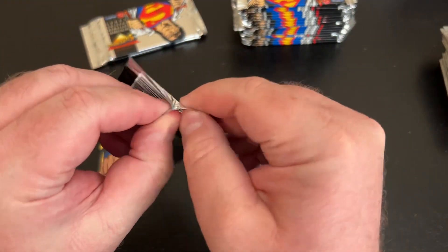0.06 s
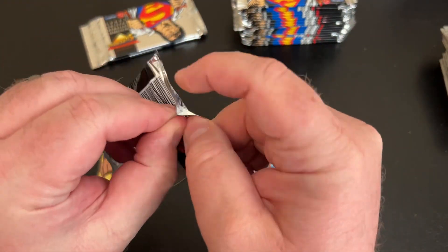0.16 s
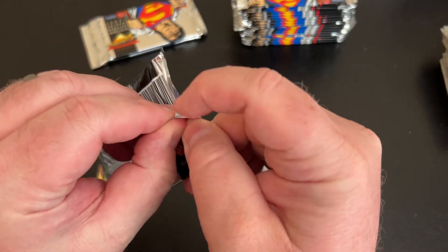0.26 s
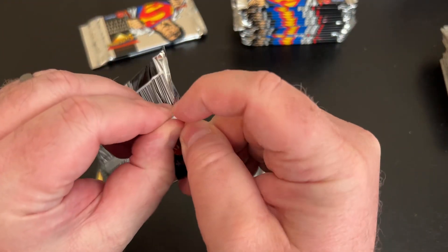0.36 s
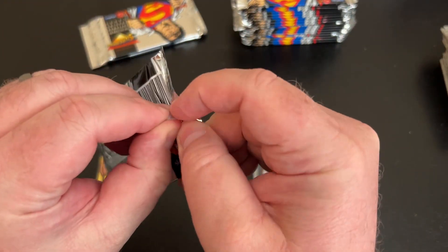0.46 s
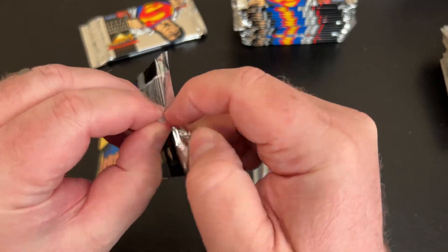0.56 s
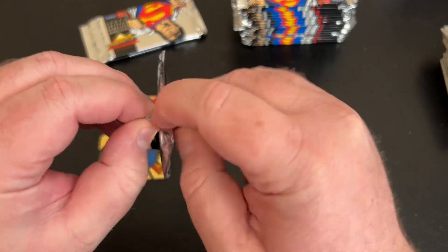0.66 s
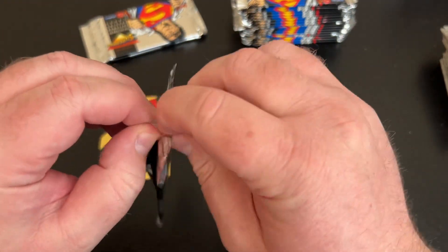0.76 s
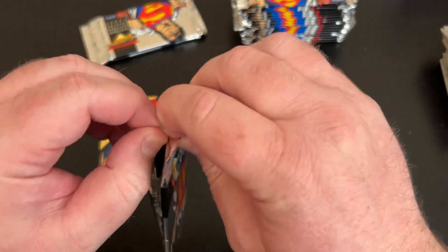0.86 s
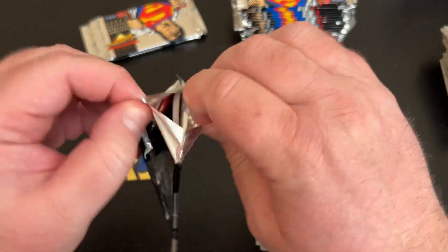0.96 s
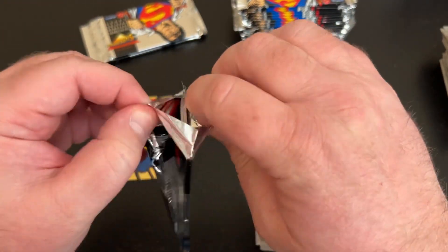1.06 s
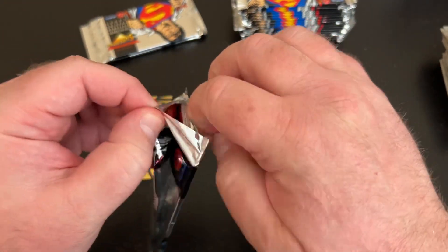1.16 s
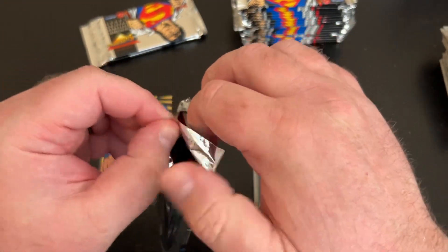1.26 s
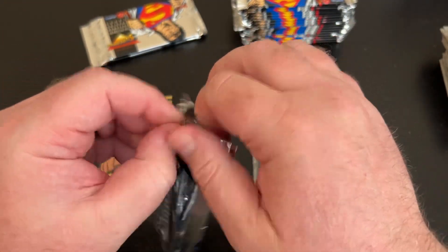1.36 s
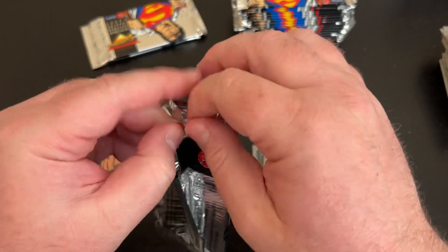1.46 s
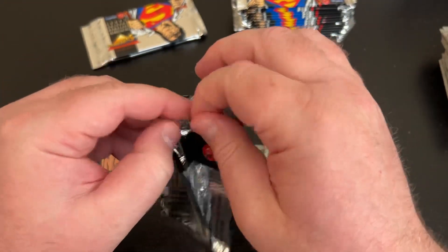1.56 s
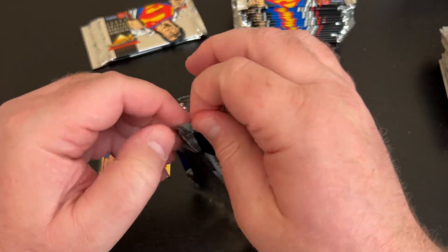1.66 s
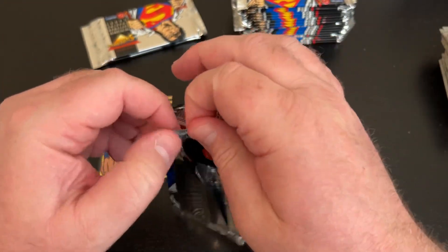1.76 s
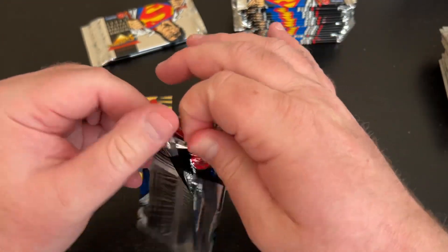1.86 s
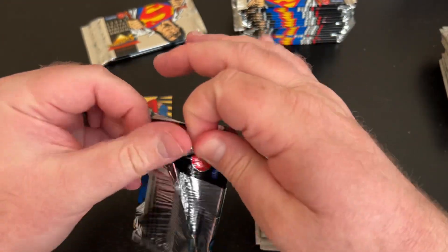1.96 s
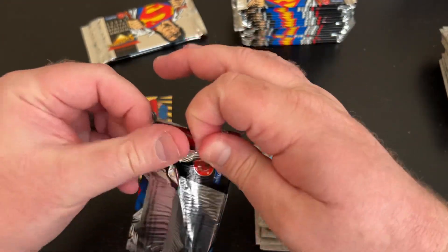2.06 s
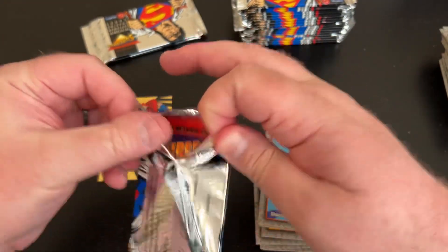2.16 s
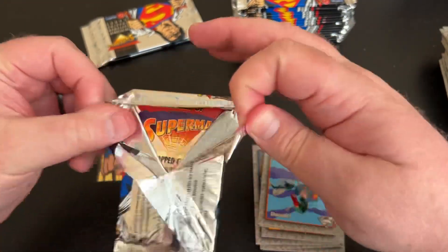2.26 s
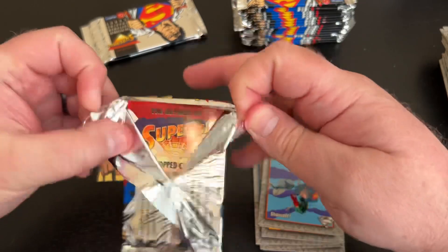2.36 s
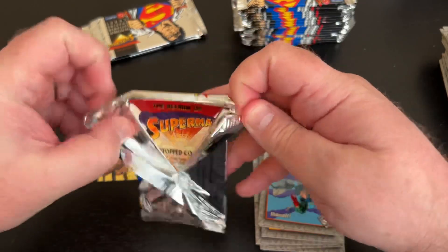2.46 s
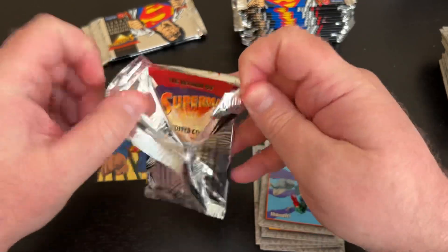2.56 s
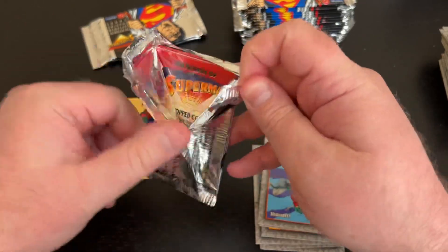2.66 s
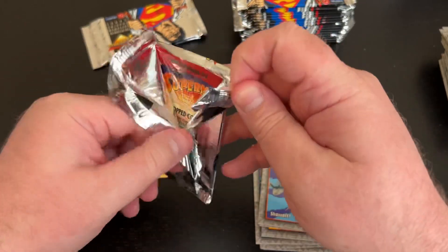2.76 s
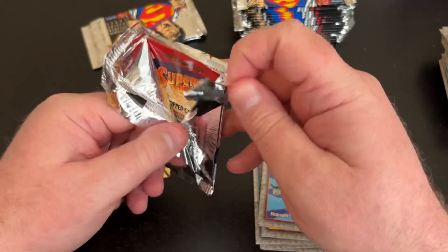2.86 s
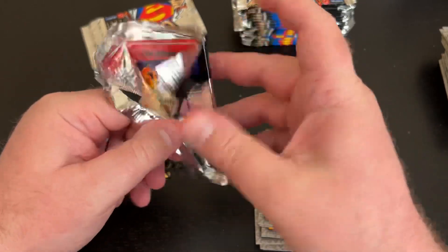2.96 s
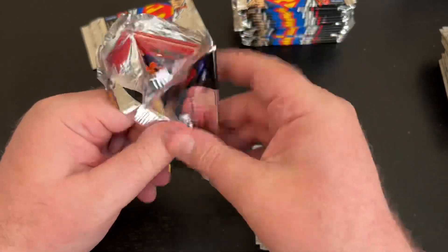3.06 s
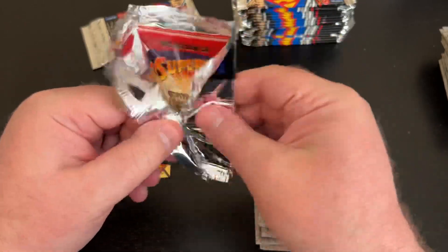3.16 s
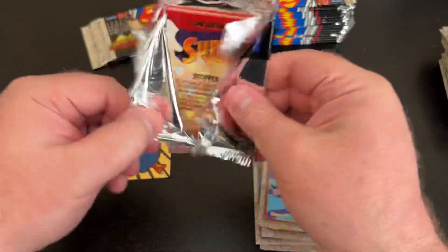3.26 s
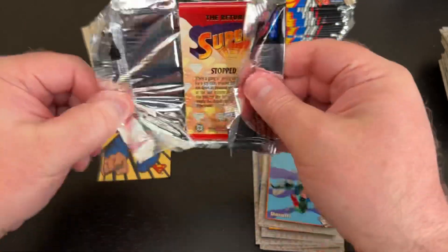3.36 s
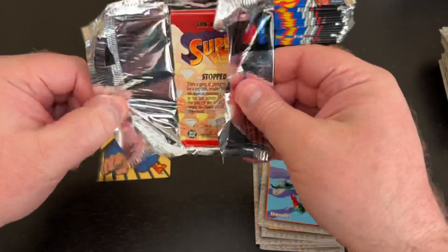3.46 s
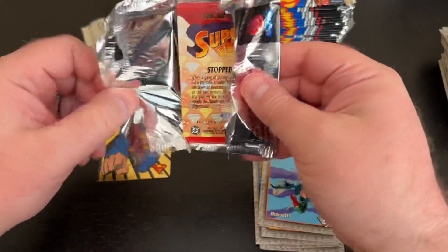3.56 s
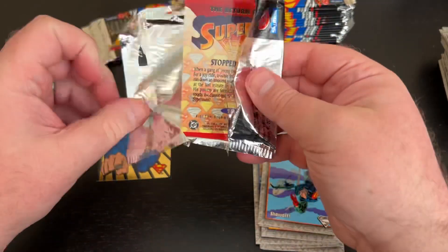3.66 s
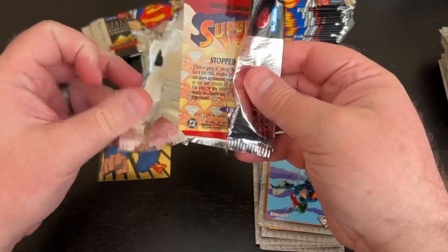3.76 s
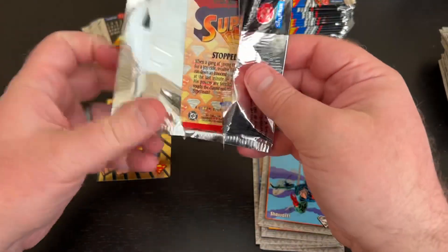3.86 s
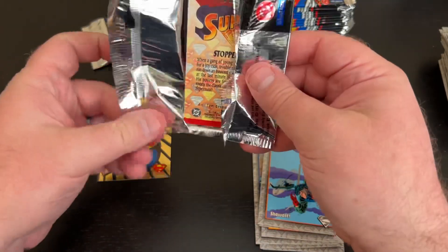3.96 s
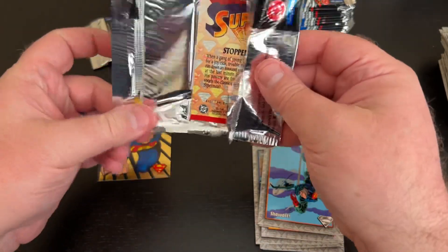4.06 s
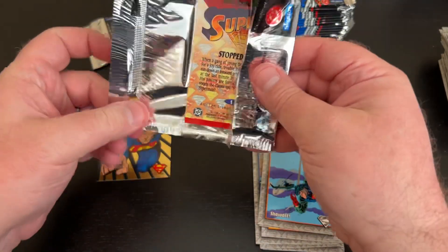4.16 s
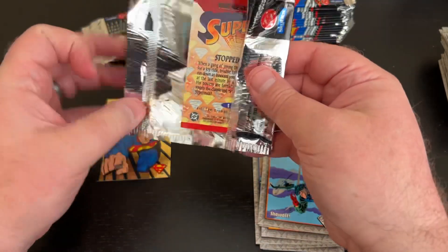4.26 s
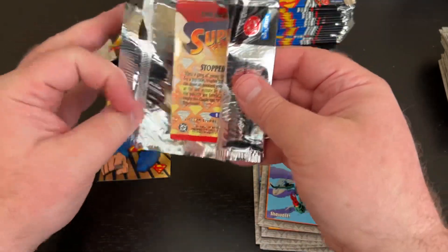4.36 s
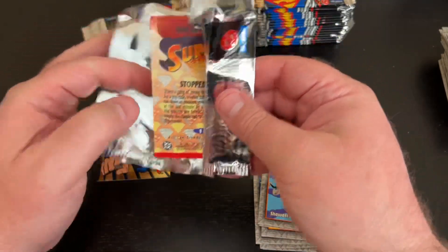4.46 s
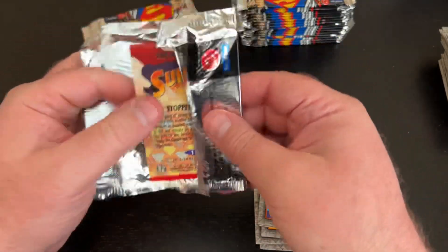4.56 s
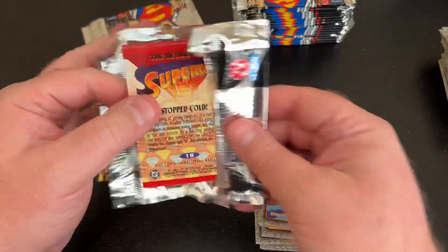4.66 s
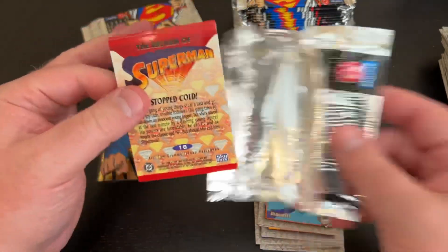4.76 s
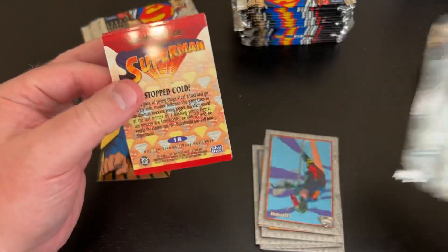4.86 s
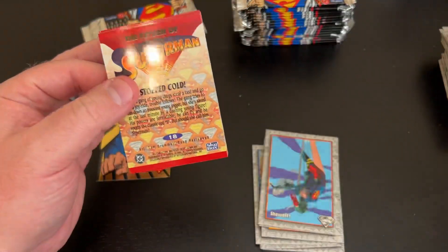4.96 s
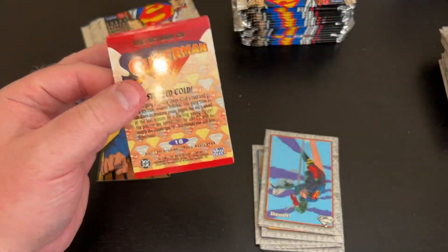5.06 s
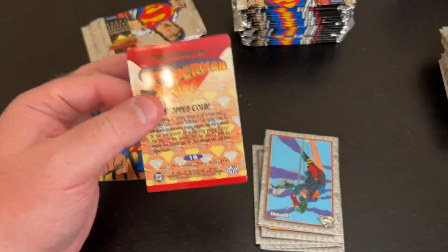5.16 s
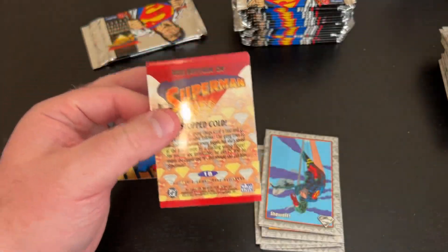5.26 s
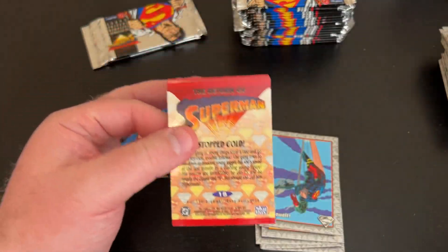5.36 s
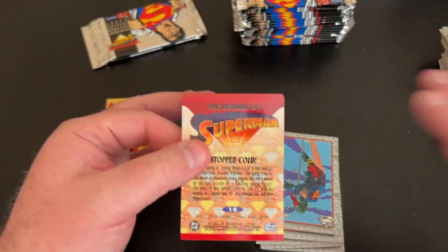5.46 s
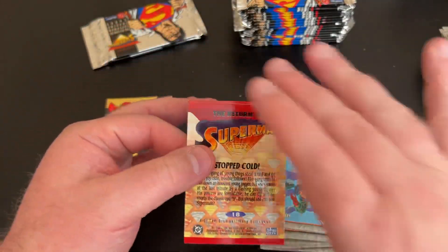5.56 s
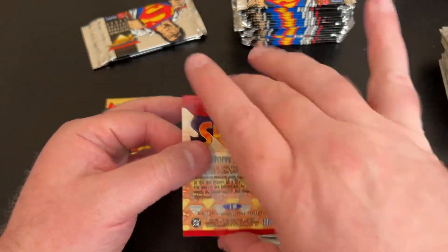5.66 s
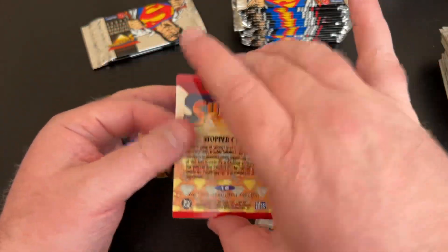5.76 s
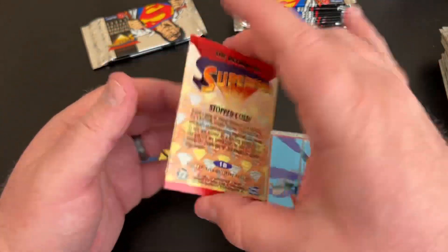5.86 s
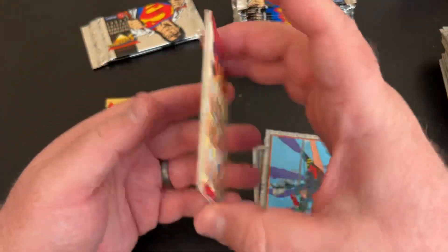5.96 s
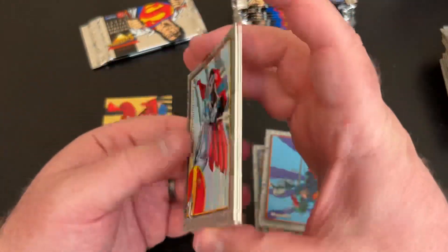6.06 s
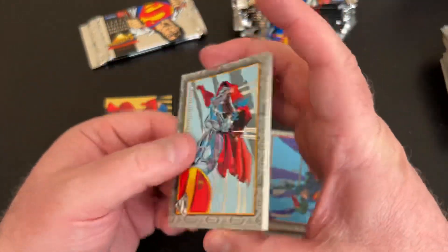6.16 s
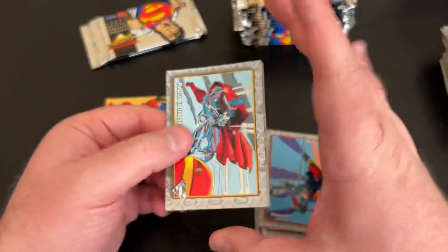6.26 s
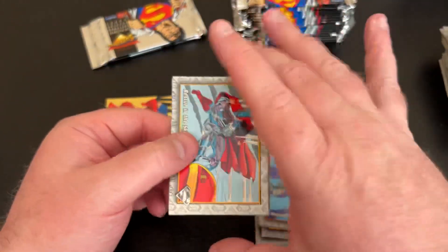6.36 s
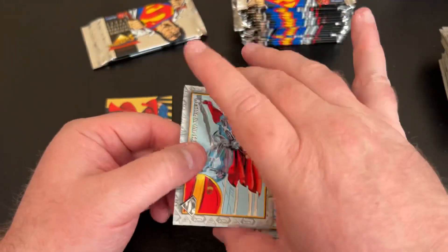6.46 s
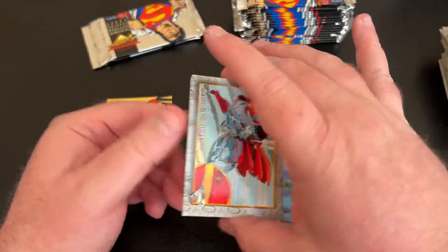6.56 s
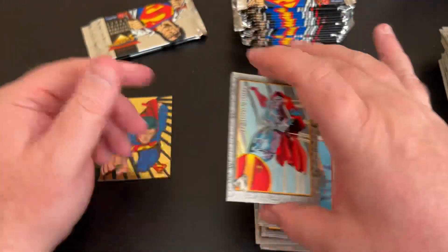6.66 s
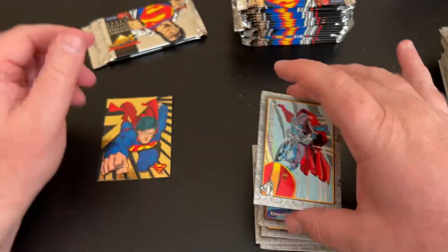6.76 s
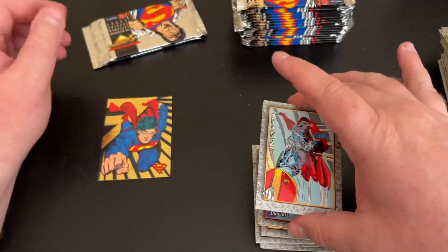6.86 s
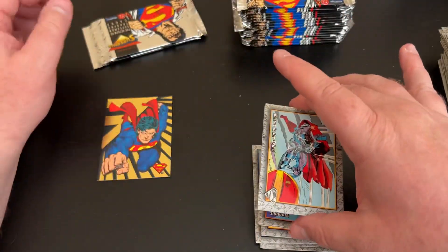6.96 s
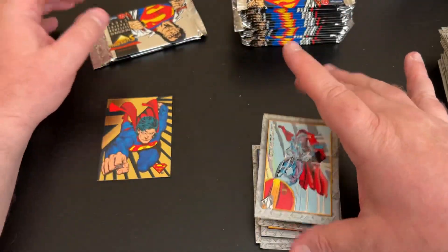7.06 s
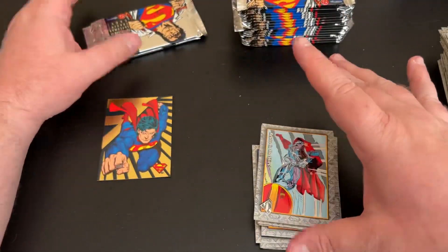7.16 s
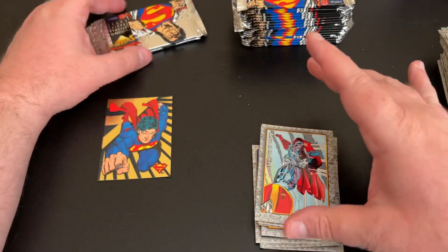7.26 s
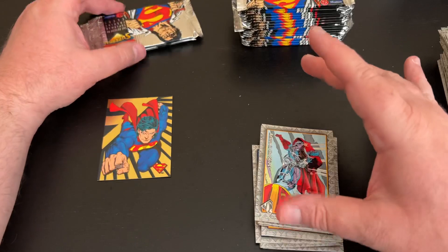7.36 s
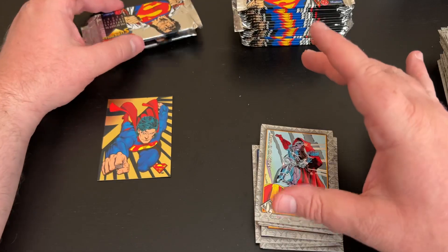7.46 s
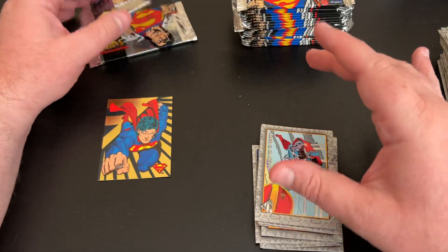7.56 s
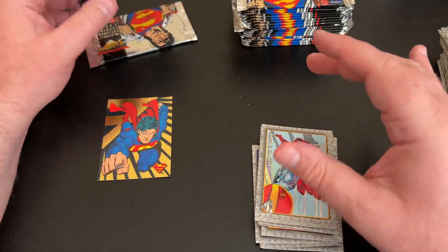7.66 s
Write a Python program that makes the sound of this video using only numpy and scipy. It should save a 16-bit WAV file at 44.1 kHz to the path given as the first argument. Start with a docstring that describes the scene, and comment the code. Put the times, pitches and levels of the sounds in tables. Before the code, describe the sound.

A close, dry stereo pickup in a small, softly furnished room, with low rumble, faint mains hum and a very short echo. From 0 s thin, bright foil snaps and ticks come quickly, a little left, easing by 0.6 s. At about 0.9 s a loud, sharp tearing burst stands out. Lighter crackle continues from 1.2 to 2.0 s, then fuller crumpling at 2.1-2.6 s with a dull table knock. The densest, loudest rustling runs 3.1-3.4 s, with a firm knock near 3.3 s. Deeper, scattered crinkles and small bumps follow to 4.8 s, moving towards centre and fading out by 5.3 s. Then near silence, with very faint card brushes around 5.7-6.5 s. A soft, hollow, hissing slide of skin on the table swells at 6.7-7.3 s, peaking at 6.9 s, with low double taps near 7.1 s and 7.5 s, then quiet.

```python
"""Foil packet torn open at a table

Two hands tear open a foil packet close under a phone with two microphone ports, left of centre at first,
pull out the cards and lay them on a table. Foil snaps and crackle are short noise bursts rung by facet modes;
a forearm slides over the table top as coloured noise, and knocks ring the table as decaying sines.
Table top and walls return a short echo; behind lie low shaking, room air and mains hum, all filtered noise or sines."""
import sys
import numpy as np
from scipy import signal
from scipy.fft import rfft, irfft, next_fast_len
from scipy.io import wavfile
from scipy.ndimage import uniform_filter1d

SR = 44100
rng = np.random.default_rng(int(sys.argv[2]) if len(sys.argv) > 2 else 0)


def transcribe(signal):
    """Save signal, clipped to [-1, 1], as a 16-bit WAV file at the path in sys.argv[1]."""
    frames = np.atleast_2d(signal).T
    limited = np.clip(frames, -1, 1)
    pcm = np.round(limited * 32767).astype(np.int16)
    wavfile.write(sys.argv[1], SR, pcm)


N = 339570
SIDES = np.array([[1], [-1]])  # sign of the difference signal on the left and right port


def undb(db):
    """Amplitude factor of a level in dB."""
    return 10 ** (np.asarray(db) / 20)


def unit(x):
    """Scale to an rms of 1."""
    return x / np.sqrt(np.mean(x ** 2))


def curve(table):
    """Columns of a table, interpolated at every sample."""
    s, *columns = np.transpose(table)
    return [np.interp(np.arange(N) / SR, s, c) for c in columns]


def shape(x, points):
    """Colour by (frequency [Hz], level [dB]) points, joined over log frequency."""
    hz, db = np.transpose(points)
    size = next_fast_len(N + SR // 10)
    f = np.maximum(np.arange(size // 2 + 1) * SR / size, 1)
    gain = undb(np.interp(np.log(f), np.log(hz), db))
    return irfft(rfft(x, size) * gain, size)[..., :N]


def walk(rate):
    """Random levels, a new one every 1 / rate s, joined by ramps; spread about 0.65."""
    hold = int(SR / rate)
    steps = np.repeat(rng.standard_normal(N // hold + 1), hold)
    return 0.8 * uniform_filter1d(steps, hold)[:N]


# the packet opens and sounds deeper: (time [s], depth = 0.4-1.2 kHz above 1.2-2.7 kHz [dB],
# left minus right [dB])
PACKET_OPENING = [(0, -8, 4.5), (.55, -6.5, 5), (.8, -8, 3), (1.2, -5.5, 4), (2, -10, 3.5),
                  (2.2, -5.5, 2.5), (2.5, -5, 3.5), (3, -6, 3), (3.4, -2.5, 3.5), (4, 1.5, 1.5),
                  (4.3, 2, 2), (5.4, 0, 0)]
# foil buckling loudly, before the packet colours it: (time [s], level at 4.5-9 kHz [dB], level above that
# at 0.4-1.2, 1.2-2.7, 2.7-4.5 and 11-16 kHz [dB] each, rise [s], t60 [s])
FOIL_SNAPS = [(0.0258, -39, -18, -16, -30, 1.5, 0.0003, 0.026), (0.0543, -39, -13, -4, 1, 2, 0.0026, 0.012),
              (0.0825, -32, -38, -25, -21, 7, 0.0003, 0.0066),
              (0.0933, -30, -31.5, -12.5, -24, 3, 0.00029, 0.023),
              (0.1043, -42.5, -24, -3, -14, 10, 0.00035, 0.005),
              (0.1126, -45, -31, -18, -15.5, 4.5, 0.001, 0.0057),
              (0.1507, -33, -31, -24, -25, 7.5, 0.00015, 0.006),
              (0.1632, -33, -37, -32.5, -31, 5, 0.00051, 0.004),
              (0.18, -35.5, -47.0, -29.0, -21.5, -14, 0.00041, 0.007),
              (0.1891, -28, -29.5, -23, -26, 4.5, 0.0003, 0.0045),
              (0.21, -35.5, -40, -16, -30, 6, 0.0003, 0.0086),
              (0.255, -37.5, -25, -21, -22, -3, 0.00088, 0.019),
              (0.276, -35, -28, -17.5, -30, 2.5, 0.00026, 0.019),
              (0.3235, -46, -17, -17, -21, -5, 0.0004, 0.013),
              (0.381, -57, -25.0, -23, -9, 7, 0.00028, 0.004),
              (0.388, -39, -50.0, -31, -19, 8, 0.00019, 0.004),
              (0.4017, -39.5, -27, -9.5, -22, 4, 0.00041, 0.003),
              (0.4508, -45, -31, -15, -20, 6.5, 0.00027, 0.00394),
              (0.493, -44.5, -17.0, -3, -16, 4.5, 0.0003, 0.008),
              (0.4976, -50, -26.0, -15, -12, 6.5, 0.0012, 0.004),
              (0.5071, -38.0, -39.0, -26, -2.5, -3, 0.00035, 0.028),
              (0.5137, -40, -22, -8, -3.5, -3, 0.0051, 0.029),
              (0.5833, -53, -26.0, -12, -13, 6, 0.0003, 0.009),
              (0.596, -55, -27.0, -5, -14, 5, 0.0003, 0.005), (0.604, -52, -8, -12, -3, 3, 0.0004, 0.014),
              (0.6138, -47.5, -10, -8, -4, -10, 0.0005, 0.018),
              (0.6227, -49.5, -12.0, -6, 0, 6, 0.0003, 0.017),
              (0.636, -41.5, -15, -7, -7, -3, 0.00024, 0.0057),
              (0.656, -48, -4.5, -3, -0.5, 5, 0.0003, 0.016),
              (0.6879, -28, -22, -15, -30, 0, 0.0003, 0.004),
              (0.802, -38.5, -22, -21, -17.5, -12.0, 0.0016, 0.005),
              (0.8766, -48.5, -7.5, -0.5, -8, 3.5, 0.0009, 0.022),
              (0.903, -43.5, -22.5, -13.5, -9, 8.5, 0.00076, 0.005),
              (0.914, -19, -19, -14, -9.5, -2.5, 0.00099, 0.065),
              (0.925, -22.5, -16, -5, -5.5, -7.5, 0.0022, 0.022),
              (0.932, -30, -10, 5, 4.5, -5.5, 0.0078, 0.05),
              (0.943, -23.5, -26, -6.5, -5.5, -8.5, 0.0047, 0.016),
              (0.971, -26.5, -8.5, -12.5, -6, -6, 0.0018, 0.0221),
              (0.9782, -25, -16, -9, -6, -15.0, 0.0044, 0.031),
              (1.0103, -37.5, -19, -18.5, -6, -1, 0.0018, 0.021),
              (1.1866, -51, -4, -11.5, -6.5, 6.5, 0.0003, 0.009),
              (1.211, -34.5, -14.5, -12.5, -10, 5, 0.00035, 0.0065),
              (1.2177, -23, -18.5, -11, -16.5, 1.5, 0.00026, 0.006),
              (1.3436, -38.5, -14, -14, -8.5, -1, 0.0008, 0.01),
              (1.3545, -41.5, -12.5, -6.0, 2, -6, 0.0005, 0.016),
              (1.3637, -35, -4.5, -3.0, -22, -5.5, 0.0021, 0.041),
              (1.3742, -29.5, -23, -9, -26, -6, 0.0013, 0.009),
              (1.3863, -32, -20, -27, -10, -1.5, 0.00046, 0.011),
              (1.465, -44, -2.5, -5, -6.5, -3, 0.0004, 0.04),
              (1.5274, -31.5, -21, -18, -3.5, -3.5, 0.00064, 0.021),
              (1.5394, -39.5, -4, 9, -5, -5, 0.001, 0.017),
              (1.5671, -39.5, -7, -11, -12, -4, 0.0041, 0.017),
              (1.5934, -36, -15.0, 0.5, -2.5, -1, 0.00081, 0.032),
              (1.611, -39, -10, -13, -17, -4, 0.00091, 0.026), (1.64, -42, -7, -1, -4, 1, 0.00071, 0.015),
              (1.6462, -33, -8, 0.5, -2, -5.5, 0.0024, 0.053),
              (1.6785, -35, -22, -15, -6, 3, 0.0005, 0.017), (1.713, -38, -6.5, -8, -9, -4, 0.0043, 0.014),
              (1.7358, -39, -23.0, -32.0, -7, -4, 0.00023, 0.0092),
              (1.8111, -30, -34, -8.5, -1, 1, 0.00027, 0.0065),
              (1.8294, -40.5, -30, -26, 2, -6.0, 0.0011, 0.015),
              (1.842, -38.5, -29, -12, -3.0, 1.5, 0.0004, 0.049),
              (1.855, -42.5, -21, -17, -3, 9, 0.0025, 0.016),
              (1.884, -42.5, -8, -17, -6, 0.5, 0.00083, 0.007),
              (1.8944, -41, -9, 1.5, -5.0, 4, 0.00033, 0.022),
              (1.904, -47, -13.0, -17, 4, 5, 0.0003, 0.005), (1.9246, -42, -1.5, -10, -1, 2, 0.0003, 0.02),
              (1.9597, -58, 13, 24.5, 14, 4, 0.00061, 0.027),
              (1.979, -44.5, -18, -17, 0, 3, 0.00069, 0.014),
              (2.0098, -49.5, -16, -3, 6.5, 0, 0.0008, 0.016),
              (2.1045, -45.5, -7, 6, 6.5, 3.5, 0.0005, 0.025),
              (2.127, -44.5, 4, 7.5, 6, 7.5, 0.00063, 0.03), (2.143, -38.5, -4.5, 9, -3, 0, 0.00072, 0.042),
              (2.162, -34.5, -2, -5, 2, -0.5, 0.0043, 0.021),
              (2.17, -26.5, -1.5, -5, -11, -4.5, 0.0026, 0.044),
              (2.183, -33, -7, -19, -5, 2.5, 0.00063, 0.021), (2.195, -34, -4, -14, 0, -4, 0.0047, 0.05),
              (2.2434, -31.0, -7, -1, 2, 11, 0.00036, 0.013),
              (2.2643, -30, -27, -1, 5.5, -4.5, 0.0039, 0.012),
              (2.289, -37.5, -18, -24, -1, 1.5, 0.0005, 0.013),
              (2.312, -25.5, -17.5, -28, -2, -5.5, 0.0048, 0.05),
              (2.34, -36.5, -19, -12, 7.5, -1, 0.00052, 0.011),
              (2.35, -34.5, -22, 1.5, -12, 3, 0.00055, 0.009),
              (2.3588, -50, 2, -16, -11, -9, 0.00083, 0.025), (2.386, -31, -12, -5, -11, 5, 0.0003, 0.0057),
              (2.4096, -35, -2, 6, 0.5, -10, 0.00038, 0.0051),
              (2.4825, -27, 2.5, 6.5, -1, -1, 0.0019, 0.012), (2.495, -37, -24, 7, -10, -8, 0.00074, 0.039),
              (2.5075, -37.5, 3, -4, -3, 3.5, 0.001, 0.009),
              (2.5186, -30, -4.5, -0.5, -8, 4, 0.00071, 0.017),
              (2.568, -48, -18, -5.0, 2, 3, 0.0007, 0.028), (2.5798, -50, -10, 2, -9, 3, 0.00056, 0.012),
              (2.5904, -33.5, -4, -1, -1, 4, 0.00037, 0.032), (2.6875, -60, 8, 5, -1, -6, 0.0008, 0.012),
              (2.716, -46.5, 3.5, 1, -7, -4.0, 0.00074, 0.016),
              (2.7259, -40.5, -6, -3, -1.5, 2, 0.00076, 0.045),
              (2.749, -51, -12, -3, -3, -7, 0.00051, 0.015), (2.7708, -37, -14, -4.5, -7, 1, 0.0003, 0.008),
              (2.7774, -35, -16.5, -17, -15, 0, 0.00017, 0.005607),
              (2.802, -46.5, -23, -11, -8, 9, 0.0003, 0.019),
              (2.8127, -37, -19, -13, -13, -5, 0.00035, 0.011),
              (2.83, -42, -28, -19, -7, 1, 0.00035, 0.019),
              (2.8821, -39.5, -13, -7.0, -4, 6.5, 0.00059, 0.0089),
              (2.897, -36, -14, -18, -9, 1, 0.00067, 0.012),
              (2.9064, -37.5, -1.5, 5.5, -1, -30, 0.00059, 0.029),
              (2.9405, -31.5, -19, -8.5, -10, -3.5, 0.00073, 0.011),
              (2.9745, -53, 9.5, 10.5, -2, -4, 0.001, 0.014),
              (3.0738, -26.5, -19.5, -10.5, -7.5, 0.5, 0.0003, 0.02),
              (3.096, -37.5, -5.5, -8.5, -10, -8.5, 0.0056, 0.03),
              (3.1174, -28.5, -17.5, -17, -10.5, 5, 0.0003, 0.012),
              (3.1231, -30.5, -18, -8.5, -3, 5, 0.0018, 0.004),
              (3.1451, -35, -8, -13.5, -8.5, 3.5, 0.0003, 0.005),
              (3.1535, -31.5, -19, -10.5, -3.5, 3, 0.0006, 0.015),
              (3.1616, -39.5, -17, -5.0, -2.5, -0.5, 0.0005, 0.021),
              (3.1692, -28, -11, -11, -7.5, 2.5, 0.0006, 0.029),
              (3.1827, -29, -17.5, -7, -4.5, 0, 0.00035, 0.011),
              (3.1891, -28, -7, -7, -3, 5.5, 0.0005, 0.046),
              (3.1997, -23, -22.0, -3.5, -3, 3, 0.0027, 0.02),
              (3.223, -22, -11.5, -4.5, 1.5, -0.5, 0.0004, 0.021),
              (3.2413, -25, -1.5, 2.5, 4, 2.5, 0.0051, 0.044),
              (3.2615, -23.5, -16.5, -4, -3.5, 3.5, 0.0019, 0.015),
              (3.2666, -24, -7, -2, -4.5, -1.5, 0.0051, 0.023), (3.2967, -26, 5, 7, 0, 5.5, 0.0057, 0.04),
              (3.3258, -24.5, 1, -1, 0, 5, 0.0031, 0.036), (3.3322, -16.5, -0.5, 1, -4, -6, 0.0057, 0.028),
              (3.357, -22, 0, 4, -2.5, 2, 0.0032, 0.018), (3.4331, -44.5, 9, 12.5, 5, -9, 0.00079, 0.024),
              (3.455, -43, -20.5, -10.5, -4.5, 0, 0.001, 0.013),
              (3.476, -47, -1.5, 2, -1.5, 4.5, 0.0005, 0.005),
              (3.489, -36.5, 0, -17, -12.5, -4.5, 0.001, 0.012),
              (3.5014, -30.5, 0, -1, -6.5, 1, 0.00079, 0.016),
              (3.5153, -42.5, -2, 7.5, 1.5, -6, 0.0006, 0.018),
              (3.5315, -49.5, -4, -7.5, -15, 15.5, 0.00033, 0.0049),
              (3.5683, -27.5, -3.5, -2.5, 0.5, 8, 0.0002, 0.005),
              (3.5745, -34, -2, -2, -9, -1, 0.0064, 0.015),
              (3.5963, -37, 5, -1.5, -3.5, 12.5, 0.00077, 0.017),
              (3.63, -39.5, -1.5, -12, -15, -10, 0.0019, 0.015), (3.651, -50, 6, 3, -2, -1, 0.001, 0.012),
              (3.671, -51, 8.5, 3, -6, -5, 0.0016, 0.01), (3.682, -52, 14.5, 4, 4, -4, 0.001, 0.012),
              (3.6957, -48, 11, -3, -1.0, -6.0, 0.0004, 0.017),
              (3.7291, -38.5, -5, -1.5, -21, 1, 0.0005, 0.019),
              (3.761, -41.5, -2.5, -3, -12, 0, 0.003, 0.014), (3.811, -55, 8.5, -8, -10, -4, 0.0006, 0.014),
              (3.8933, -53.5, 2.5, 6, -16, -1, 0.00065, 0.012), (3.9022, -53.5, 2, 7, 0, 7, 0.0004, 0.027),
              (3.9727, -40, 2, -1, -11, 2.5, 0.0013, 0.024), (4, -46.0, -12, -4.0, -5, 3, 0.00033, 0.017),
              (4.038, -27, -13.5, -17, -11, 5.5, 0.00024, 0.0039),
              (4.0575, -33.5, 10.5, 3, -3, -18, 0.0026, 0.021),
              (4.0685, -32.0, 2.5, 5, -7, -8, 0.0012, 0.016),
              (4.115, -34.5, 7, 11.5, -7, 5, 0.00059, 0.017), (4.125, -34, -24, -25, -6, 1, 0.0005, 0.011),
              (4.137, -38.5, -7, -13, -7, -21, 0.0018, 0.018),
              (4.166, -39, -9, -4, -5.5, -4, 0.0003, 0.018),
              (4.1901, -43, -11.0, -1, -5, 4, 0.00044, 0.0071), (4.2, -42, 1, 3, -9, 6, 0.00031, 0.015),
              (4.2084, -35, -0.5, -3, -6, 5, 0.002, 0.017), (4.2346, -26, -15, -1.5, -4, 1, 0.00082, 0.016),
              (4.285, -48, 4, -2, 5, -2, 0.00037, 0.017), (4.3232, -54, -18, -1, -9, 3, 0.0004, 0.0099),
              (4.419, -43, -2.5, -4, -5, -16, 0.0027, 0.028), (4.5317, -65, 9, 2, -1, -12, 0.0004, 0.008),
              (4.5502, -49.5, 7.5, 6, 2, -10, 0.00041, 0.012),
              (4.578, -36, -14, -5.5, 0, 1, 0.00051, 0.015),
              (4.6478, -44.5, 0.0, -1, -15, 12.5, 0.0003, 0.0035),
              (4.669, -39.5, -10, -9, -12, -1, 0.0004, 0.006),
              (4.7185, -41.5, 3.5, 3, -10, -2, 0.002, 0.048),
              (4.7257, -33.5, -23, -9.5, -12, 7, 0.00021, 0.004),
              (4.827, -42, -14, 1.5, 1, -8, 0.00026, 0.022),
              (4.9049, -49, -7, -1.5, 0.5, -2, 0.00071, 0.014),
              (4.9356, -54.5, 0, -0.5, -10, -15, 0.0006, 0.013),
              (5.012, -53.5, -4, -1.5, -2.5, -4, 0.00044, 0.082),
              (5.0665, -56.5, -18, -4, 5, -18, 0.00071, 0.013),
              (5.076, -43, -17, -21, -5.5, -11, 0.00016, 0.0092),
              (5.142, -54.5, -6, -19, -3, -15, 0.0008, 0.03),
              (5.192, -49, -10, -12, -6, -13, 0.0005, 0.018),
              (5.232, -58.5, -14, -7, -1, -17, 0.0006, 0.013)]
SNAP_PAN_SCATTER_DB = 3


def snaps():
    """Single loud buckles of the foil, scattered about where the packet lies at that moment."""
    at = (np.transpose(FOIL_SNAPS)[0] * SR).astype(int)
    pan = curve(PACKET_OPENING)[1][at]
    pan = pan + SNAP_PAN_SCATTER_DB * rng.standard_normal(len(FOIL_SNAPS))
    return bursts(FOIL_SNAPS, pan, lag_spread=4.4)


CLUMP_DB = 3  # per unit of walk: buckles set each other off, so the crackle comes in clumps
CRACKLE_AIR_DB = -6.5  # mean level of the top band above 4.5-9 kHz


def crackle(count=5000):
    """Many small buckles of uneven size, colour and place follow the pulls on the foil."""
    chance = rng.random((count, 8))
    s = (np.arange(count) + 3 * chance[:, 0]) * PACKET_OPENING[-1][0] / (count + 3)
    at = (s * SR).astype(int)
    db, fullness = handling(s)
    db = db + CLUMP_DB * walk(45)[at]
    depth, pan = (c[at] for c in curve(PACKET_OPENING))
    size_db = np.minimum(-4 * np.log(1 - chance[:, 1]), 12) - 13  # relative to the pulls' level
    band_db = bands_db(fullness, depth, CRACKLE_AIR_DB) + 8 * (chance[:, 2:7] - .5)
    pan = pan + 6 * (chance[:, 7] - .5)
    t60 = .005 + .008 * chance[:, 2]
    rise = 0.00023 + 0.0018 * chance[:, 3] ** 2
    return buckle(s, db + size_db, band_db, pan, t60, rise, lag_spread=8., size=512)


# pulls on the foil, each a rush of crackle: (start [s], peak [s], end [s], peak level at 4.5-9 kHz [dB],
# fullness = level above that at 1.2-2.7 kHz [dB]); crackle then sets the size of each buckle
FOIL_PULLS = [(-.08, 0.101, 0.17, -41, -10), (.147, 0.146, 0.2, -34, -29), (.05, 0.156, 0.81, -47, -17),
              (0.374, 0.39, 0.48, -42, -14.5), (0.376, 0.504, 0.87, -52, -5), (0.637, 0.686, 0.82, -46, 0),
              (0.717, 0.8, 0.96, -48, -1), (0.903, 0.933, 1.03, -18.5, -6), (.95, 1.047, 1.28, -50.5, -8),
              (1.153, 1.168, 1.21, -48, -1), (1.196, 1.216, 1.33, -36, -8.5),
              (1.329, 1.367, 1.514, -37, -5.5), (1.508, 1.533, 2.15, -44.5, -1.5),
              (1.787, 1.817, 2.04, -40.5, -3.5), (1.804, 1.953, 2.3, -50.5, 2),
              (2.073, 2.168, 2.44, -29, -2.5), (2.2, 2.357, 2.57, -38.5, -4.5),
              (2.471, 2.479, 2.654, -32.5, -2.5), (2.542, 2.591, 2.68, -43, -3.5),
              (2.698, 2.744, 3.05, -48.5, -4.5), (2.85, 2.918, 3.05, -42, -4),
              (3.067, 3.07, 4.2, -40.5, -7.5), (3.087, 3.204, 3.7, -32.5, -2),
              (3.146, 3.347, 3.44, -27.5, -3.5), (3.425, 3.503, 3.6, -42.5, -2.5),
              (3.55, 3.596, 3.72, -39.5, -8), (3.665, 3.753, 3.84, -44, -5.5), (3.84, 3.907, 4.07, -56, 4),
              (3.925, 3.962, 4.06, -48.5, -2), (4.026, 4.032, 4.07, -31, -6.5),
              (4.097, 4.114, 4.22, -41.5, -5.5), (4.018, 4.052, 4.15, -33, -4.5),
              (4.162, 4.237, 4.29, -32.5, -9), (4.2, 4.27, 4.45, -48, -2.5), (4.346, 4.41, 4.7, -58.5, 3),
              (4.46, 4.693, 4.9, -45, -4.5), (4.793, 5.214, 5.32, -56.5, -4)]
PULL_EDGE_DB = -30  # level at start and end, relative to the peak


def handling(s):
    """Pulls rise and fall evenly in dB and add in power: their joint level and fullness at times s."""
    start, peak, end, db, fullness = np.transpose(FOIL_PULLS)
    late = s[:, None] - peak
    progress = np.maximum(late / np.abs(end - peak), -late / np.abs(peak - start))
    power = undb(db + PULL_EDGE_DB * progress) ** 2
    total = power.sum(1)
    return 10 * np.log10(total), power @ fullness / total


MID_SHARE = 0.61  # 2.7-4.5 kHz takes this share of the fullness


def bands_db(fullness, depth, air):
    """Levels of the five bands above the 4.5-9 kHz one, which comes first."""
    flat = 0 * fullness
    return np.transpose([flat, fullness + depth, fullness, MID_SHARE * fullness, air + flat])


# touches of fingers on cards and table: (time [s], level at 4.5-9 kHz [dB], level above that
# at 0.4-1.2, 1.2-2.7, 2.7-4.5 and 11-16 kHz [dB] each, rise [s], t60 [s])
CARD_TOUCHES = [(5.67, -80, 14, 4, 2, 8, .01, .04), (5.686, -80, 10, 8, 2, 8, .004, .04),
                (5.762, -80, -4, -4, -4, 8, .008, .03), (5.9, -78, 2, -4, -3, 8, .01, .04),
                (5.925, -77, 0, 2, 1, 4, .01, .04), (6.048, -72, 8, 7, 2, 4, .015, .05),
                (6.073, -78, 20, 10, 4, 0, .003, .04), (6.165, -68, 0, 0, -2, 3, .02, .05),
                (6.19, -60, 4, 2, -3, 5, .006, .045), (6.205, -68, -4, -4, -10, 3, .025, .05),
                (6.426, -67, -14, -10, -9, -4, .003, .03), (6.515, -82, -4, -4, -4, 12, .015, .05),
                (7.095, -72, 23, 24, 12, -2, .001, .03), (7.1055, -74, 26, 25, 16, -6, .0005, .012),
                (7.11, -76, 24, 26, 14, -6, .001, .03), (7.3, -64, 2, -2, -2, 4, .005, .04),
                (7.461, -66, -2, 0, -4, 4, .002, .02), (7.475, -66, 15, 3, -4, 2, .004, .03),
                (7.672, -71, 2, 0, -3, 0, .02, .05)]


def touches():
    """Fingertips brush the cards and card edges tick on the stack: short bursts, louder on the left."""
    return bursts(CARD_TOUCHES, pan_db=4.5, lag_spread=4.7)


def bursts(table, pan_db, lag_spread):
    """One buckle for each row of an event table."""
    s, db, *above, rise, t60 = np.transpose(table)
    band_db = np.transpose([0 * s] + above)
    return buckle(s, db, band_db, pan_db + 0 * s, t60, rise, lag_spread, size=2048)


# filter bands that carry a buckle's five levels: (low edge [Hz], high edge [Hz])
BUCKLE_BANDS = [(4500, 9500), (430, 1200), (1250, 2700), (2700, 4500), (9500, 17500)]
FACET_RING, FACET_Q = 1.1, 6  # how strongly and how narrowly a facet rings


def buckle(s, db, band_db, pan_db, t60, rise, lag_spread, size):
    """A dying burst rings four chance modes of a foil facet; levels are its energy spread over 5 ms."""
    chance = rng.random((len(s), 8))
    t = np.arange(size) / SR
    rise = np.clip(rise, .0002, .025)[:, None]
    t60 = np.clip(t60, .002, .05)[:, None]
    decay = undb(-60 * np.maximum(t - rise, 0) / t60)
    burst = rng.standard_normal((len(s), size)) * np.minimum(t / rise, 1) * decay

    hz = np.arange(size // 2 + 1) * SR / size
    turn = np.exp(-2j * np.pi * hz / SR)  # delay by one sample
    facet = 1
    for k in range(4):
        f = 900 * 2 ** (4 * chance[:, k, None])
        radius = np.exp(-np.pi * f / FACET_Q / SR)
        pole = radius * np.exp(2j * np.pi * f / SR)
        facet = facet + FACET_RING * (1 - radius) / (1 - pole * turn)
    rung = rfft(burst) * facet

    # further left is louder and earlier on the left port
    lag = -.8 * pan_db + lag_spread * (chance[:, 5] - .5)  # left behind right [samples]
    ports = []
    for sign in (.5, -.5):
        delay = np.exp(-2j * np.pi * hz / SR * (8 + sign * lag[:, None]))
        ports.append(rung * delay * undb(sign * pan_db)[:, None])

    # each band is scaled to its level in the mean of both ports
    filters = [signal.butter(3, edge, "band", fs=SR, output="sos") for edge in BUCKLE_BANDS]
    bands = np.array([signal.sosfreqz(sos, hz, fs=SR)[1] for sos in filters])
    energy = .5 * np.abs(ports[0] + ports[1]) ** 2 @ np.abs(bands.T) ** 2 / size
    colour = undb(band_db + db[:, None]) * np.sqrt(SR / 200 / energy) @ bands

    at = ((s * SR).astype(int)[:, None] + np.arange(size)).ravel()
    waves = [irfft(port * colour, size).ravel() for port in ports]
    return np.array([np.bincount(at, wave, N + size)[:N] for wave in waves])


# hands and cards knocking the table: (time [s], peak level [dB], push length [s])
TABLE_KNOCKS = [(2.174, -24, 0.0024), (2.184, -32, 0.004), (2.312, -37, 0.0042), (3.109, -35, 0.0042),
                (3.22, -27, 0.0025), (3.331, -18.5, 0.00048), (3.359, -36, 0.00065), (3.436, -34, 0.00062),
                (3.506, -30.5, 0.00089), (3.595, -33.5, 0.00062), (4.066, -29, 0.0016), (4.08, -41, 0.0008),
                (4.451, -35, 0.0022), (4.527, -36.5, 0.0028), (4.6, -44, 0.0054), (4.714, -36, 0.00024),
                (6.077, -50, 0.0022), (7.1042, -39, 0.0006), (7.112, -30, 0.0018), (7.134, -34.5, 0.0022),
                (7.478, -38.5, 0.0013), (7.485, -38.5, 0.0019)]
# modes of the table, before each knock's scatter: (frequency [Hz], relative level [dB], t60 [s])
TABLE_MODES = [(95, -14, 0.2), (137, -6, 0.13), (173.6, -10.5, 0.13), (233, -3, 0.071), (290, -0.5, 0.05),
               (340, -31.5, 0.041), (570, -3, 0.038), (738, -21.5, 0.031), (1100, -33.5, .03)]
KNOCK_SWELL_CYCLES = 0.46  # time constant of each mode's build-up, so the lows arrive late


def knocks():
    """A soft push rings the table modes, a little differently each time."""
    out, t = np.zeros(N + SR), np.arange(SR // 4) / SR
    for s, db, push in TABLE_KNOCKS:
        ring = 0
        for (hz, level, t60), chance in zip(TABLE_MODES, rng.standard_normal(len(TABLE_MODES))):
            swell = 1 - np.exp(-t * hz / KNOCK_SWELL_CYCLES)
            ring = ring + undb(level + 3 * chance - 60 * t / t60) * np.sin(2 * np.pi * hz * t) * swell
        ring = np.convolve(ring, np.hanning(int(push * SR) + 3))[:len(t)]
        out[int(s * SR):][:len(t)] += undb(db) * ring / np.abs(ring).max()
    return out[:N] * undb(.3 * SIDES)  # slightly louder on the left


# forearm sliding on the table, before the flicker: (time [s], rub level [dB], hiss level [dB])
FOREARM_SLIDE = [(6.58, -83.5, -102), (6.648, -71.5, -75), (6.75, -62, -62.5), (6.82, -52.5, -53.5),
                 (6.9, -50, -49.5), (7.0, -54.5, -54.5), (7.146, -56.5, -56.5), (7.232, -59, -60.5),
                 (7.3, -64, -64), (7.36, -76.5, -80.5)]
# rubbing body of skin and table: (frequency [Hz], relative level per Hz [dB])
RUB_COLOUR = [(250, -19.5), (450, -6.5), (610, -0.5), (750, -8.5), (900, 0.5), (1200, -4), (1660, -0.5),
              (2200, -4.5), (2800, -11.5), (3200, -8.5), (3800, -16.5), (5000, -39.5)]
# fine hiss of the skin: (frequency [Hz], relative level per Hz [dB])
HISS_COLOUR = [(1500, -30), (3000, -6.5), (4200, -4.5), (5500, -4), (7800, 0.5), (12000, -10.5),
               (16500, -6)]


def slide():
    """Skin drags on the table: a hollow rub and a fine hiss that swells faster, both flickering with the grip."""
    s, *levels = np.transpose(FOREARM_SLIDE)
    out = 0
    for db, colour in zip(levels, (RUB_COLOUR, HISS_COLOUR)):
        mid, side = (unit(shape(rng.standard_normal(N), colour)) for _ in range(2))
        points = [(0, -120), (6.55, -120)] + list(zip(s, db)) + [(7.45, -120)]
        gain = undb(curve(points)[0] + 0.96 * walk(33))
        out = out + gain * (mid + .8 * side * SIDES)
    return out


# soft furnishings swallow the treble: (frequency [Hz], level [dB])
ECHO_TREBLE = [(200, 0), (3000, 0), (8000, -3), (14000, -7)]
ECHO_DB, ECHO_T60_S = -7, 0.16  # level before the treble loss


def echo(hands):
    """Table top and walls return a short diffuse tail: the hands convolved with dying noise."""
    t = np.arange(SR // 3) / SR
    build = np.minimum(t / 0.012, 1)
    tail = rng.standard_normal((2, len(t))) * undb(-60 * t / ECHO_T60_S) * build
    tail = tail / np.sqrt(np.sum(tail[0] ** 2))
    returned = signal.fftconvolve(hands.mean(0)[None], tail, axes=1)[:, :N]
    return undb(ECHO_DB) * shape(returned, ECHO_TREBLE)


# arms leaning shake the table under the phone: (time [s], drive level of the low resonances [dB])
ARM_SHAKE = [(0, -39.5), (.19, -51), (.54, -40.5), (.75, -46), (2.1, -53), (2.19, -38.5), (2.4, -46.5),
             (3.1, -50), (3.39, -44), (3.5, -51.5), (3.75, -48), (3.99, -44.5), (4.07, -41), (4.14, -44),
             (5.79, -55.5), (7.03, -47.5), (7.23, -45.5), (7.7, -46.5)]
# low resonances of table and stand: (frequency [Hz], width [Hz], level relative to the drive [dB])
LOW_RESONANCES = [(59, 7, -2.5), (95, 8, -11)]
UPPER_DB = -64.5  # dull rumble at rest
AFTER_KNOCK_DB, AFTER_KNOCK_S = -14.5, 0.048  # its swell relative to a knock's peak, and fade time constant


def shake():
    """Noise-driven low resonances swell as the arms move; a dull upper rumble lingers after each knock."""
    ring = 0
    for hz, width, level in LOW_RESONANCES:
        b, a = signal.iirpeak(hz, hz / width, SR)
        ring = ring + undb(level) * unit(signal.lfilter(b, a, rng.standard_normal(N)))
    ring = signal.sosfilt(signal.butter(3, [40, 130], "band", fs=SR, output="sos"), ring)
    dull = signal.butter(4, [110, 300], "band", fs=SR, output="sos")
    upper = unit(signal.sosfilt(dull, rng.standard_normal(N)))
    t, after = np.arange(N) / SR, 0
    for s, db, _ in TABLE_KNOCKS:
        after = after + undb(db + AFTER_KNOCK_DB) * (t > s) * np.exp(-np.abs(t - s) / AFTER_KNOCK_S)
    return undb(curve(ARM_SHAKE)[0]) * ring + (undb(UPPER_DB) + after) * upper


# air noise of the quiet room: (frequency [Hz], relative level per Hz [dB])
ROOM_AIR = [(25, -32.5), (50, -7.5), (95, -2.5), (150, -29.5), (220, -19), (300, -33), (380, -32),
            (450, -39), (800, -47.5), (1600, -45.5), (2700, -53.5), (8000, -56.5), (13500, -57),
            (16500, -63)]
# width of the air noise: (frequency [Hz], side minus mid [dB])
AIR_WIDTH = [(60, -11), (200, -6.5), (500, 5.5), (4000, -3), (16000, 1)]
# mains hum of an appliance, before it wanders: (frequency [Hz], level in the sum [dB],
# level in the difference [dB])
MAINS_HUM = [(124.3, -67, -77), (232, -80.5, -70), (352, -76, -79)]
ROOM_DB = -54  # rms of the air in the middle


def room():
    """Steady air noise, shared and differing between the ports, with a faint wandering mains hum."""
    mid, side = shape(rng.standard_normal((2, N)), ROOM_AIR)
    air = undb(ROOM_DB) / mid.std() * (mid + shape(side, AIR_WIDTH) * SIDES)
    for hz, sum_db, side_db in MAINS_HUM:
        phase = 2 * np.pi * (hz * np.arange(N) / SR + rng.random())
        wander = np.sqrt(2) * undb(1.5 * walk(3.3))  # root 2: levels are rms
        air = air + wander * (undb(sum_db) * np.sin(phase) + undb(side_db) * np.cos(phase) * SIDES)
    return air


# broad resonances of packet and cupped hands: (frequency [Hz], level [dB])
PACKET_COLOUR = [(300, 9.5), (500, -3.5), (950, -1), (1250, -6), (1600, 2), (2000, -2.5), (2700, -6),
                 (3400, -3.5), (4800, -3), (7000, -0.5), (9000, -2)]


def scene():
    """Foil and touches with their echo, then slide, knocks, shaking and room, at the two ports."""
    hands = shape(snaps() + crackle(), PACKET_COLOUR) + touches()
    return hands + echo(hands) + slide() + knocks() + shake() + room()


# colour of the left-right sum at the phone's ports: (frequency [Hz], level [dB])
SUM_COLOUR = [(2000, 0), (8000, 0), (9200, -7.5), (10000, -20), (10800, -5.5), (12000, 5.5), (14500, 2),
              (15700, -8.5), (16500, -30.5)]
# colour of the left-right difference: (frequency [Hz], level [dB])
DIFFERENCE_COLOUR = [(100, -3), (700, 1.5), (2500, 1), (7500, -5.5), (11000, 4.5), (12300, -10),
                     (13500, -18.5), (15500, 0.5), (16000, -23)]
DRIVE, TOP_HZ = 1.15, 16600  # drive into the rounding; edge of the treble cut


def record(dry):
    """The ports cancel near 10 kHz in their sum, their difference has its own colour; peaks round, the top is cut."""
    mid = shape((dry[0] + dry[1]) / 2, SUM_COLOUR)
    side = shape((dry[0] - dry[1]) / 2, DIFFERENCE_COLOUR)
    rounded = np.tanh(DRIVE * (mid + side * SIDES)) / DRIVE
    return signal.sosfilt(signal.ellip(8, .2, 80, TOP_HZ, fs=SR, output="sos"), rounded)


dry = scene()
out = record(dry)
transcribe(out)
```